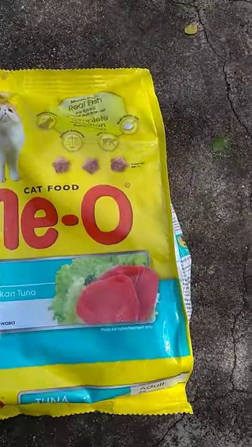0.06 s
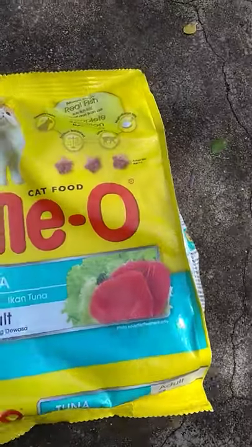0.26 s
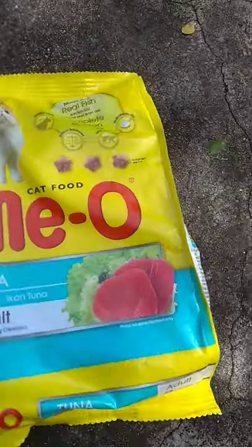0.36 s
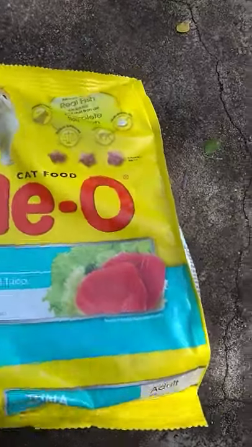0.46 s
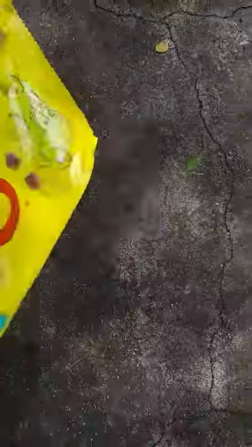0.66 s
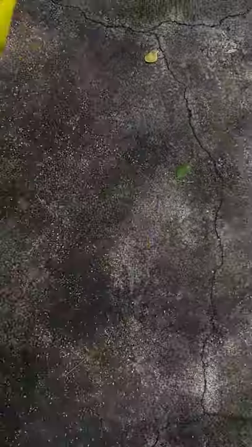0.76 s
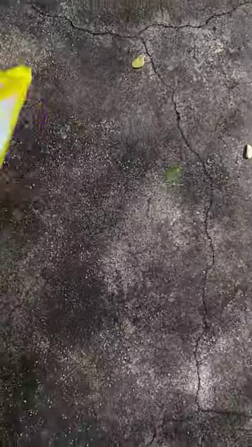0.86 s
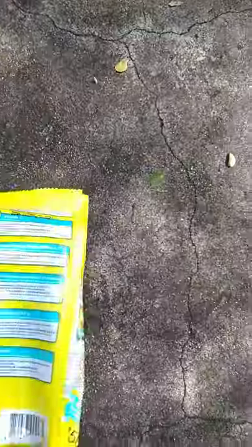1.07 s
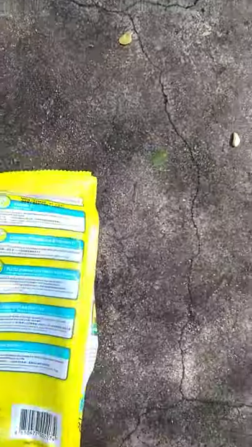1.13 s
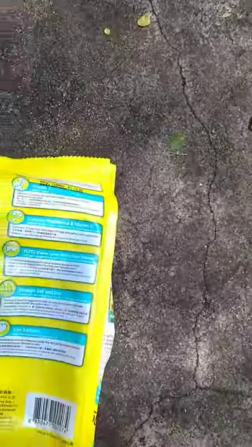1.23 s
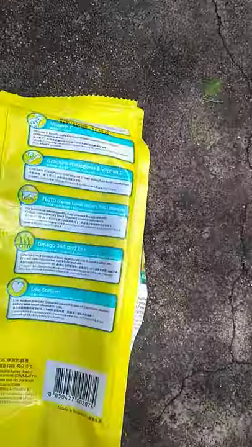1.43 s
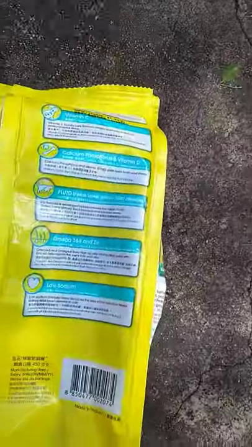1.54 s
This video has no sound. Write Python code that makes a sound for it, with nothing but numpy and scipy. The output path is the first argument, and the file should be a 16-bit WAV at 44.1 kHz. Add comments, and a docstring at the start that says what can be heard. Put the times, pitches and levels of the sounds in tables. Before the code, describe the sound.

Close up in a quiet yard, a filled plastic bag crackles: first separate snaps and pops, then a thick crinkle with dry pellets sliding and dull bumps as it is flipped. It settles, leaving a barely audible insect buzz.

```python
"""A stiff plastic pet-food bag is handled close up, outdoors, over a faint insect buzz and a low rumble.
A small bird chirps once; then the bag is gripped, single creases snap and panels of film pop through.
As it is turned over, swarms of tiny creases crackle, dry pellets slide and the filled bag thuds softly.
It is laid down on concrete and the crackle dies away, leaving the insects and a faint high whir."""
import sys
import numpy as np
from scipy import signal
from scipy.fft import rfft, irfft
from scipy.io import wavfile

SR = 44100
rng = np.random.default_rng(int(sys.argv[2]) if len(sys.argv) > 2 else 0)


def bounce(signal):
    """Save signal as a 16-bit WAV file at the path given by the first command-line argument."""
    frames = np.transpose(np.atleast_2d(signal))
    limited = np.clip(frames, -1, 1)
    pcm = np.round(limited * 32767).astype(np.int16)
    wavfile.write(sys.argv[1], SR, pcm)


N = 70560


def undb(db):
    """Decibels to gain."""
    return 10 ** (np.asarray(db) / 20)


def unit(x):
    """Scale to rms 1."""
    return x / np.sqrt(np.mean(x ** 2))


def curve(table, column=1):
    """Automation lane: one column of a table, joined by straight lines in time."""
    rows = np.array(table, float)
    return np.interp(np.arange(N) / SR, rows[:, 0], rows[:, column])


def butter(x, hz, kind, order=3):
    """Butterworth filter."""
    return signal.sosfilt(signal.butter(order, hz, kind, fs=SR, output="sos"), x)


def eq(x, points, size=2048):
    """Minimum-phase EQ through (freq_hz, gain_db) points."""
    hz, db = np.array(points, float).T
    bins_hz = np.maximum(np.fft.rfftfreq(size, 1 / SR), 1)
    gain = undb(np.interp(np.log(bins_hz), np.log(hz), db))
    cepstrum = irfft(np.log(gain))
    cepstrum[1:size // 2] *= 2
    cepstrum[size // 2 + 1:] = 0
    impulse = irfft(np.exp(rfft(cepstrum)))
    return signal.fftconvolve(x, impulse[None], axes=1)[:, :x.shape[1]]


def stereo_noise(size, correlation):
    """White noise, partly shared by left and right."""
    shared = rng.standard_normal(size)
    return np.sqrt(correlation) * shared + np.sqrt(1 - correlation) * rng.standard_normal((2, size))


def pan(db):
    """Constant-power gains for a pan given as left minus right in dB."""
    gains = undb(np.array([db, -db]) / 2).reshape(2, -1)
    return gains / np.sqrt(np.mean(gains ** 2, axis=0))


def add(out, start_s, sound):
    """Mix a sound in at a time."""
    i = max(int(start_s * SR), 0)
    out[:, i:i + sound.shape[1]] += sound[:, :max(N - i, 0)]


def reverb(x, t60_s, predelay_s):
    """Diffuse reflections of unit energy."""
    t = np.arange(SR // 2) / SR
    tail = rng.standard_normal((2, len(t))) * np.exp(-np.log(1000) * t / t60_s) * (t > predelay_s)
    return signal.fftconvolve(x, unit(tail) / np.sqrt(len(t)), axes=1)[:, :N]


# Fader ride of the insects: time_s, level_db
INSECT_FADER = [(0, -65.5), (.04, -86), (.08, -73.5), (.2, -71), (1.3, -78.5), (1.45, -93), (1.56, -99),
                (1.575, -62), (1.6, -76.5)]
# Fader ride of the distant whir: time_s, level_db
WHIR_FADER = [(1.2, -120), (1.3, -92.5), (1.41, -74), (1.46, -87), (1.54, -95.5), (1.6, -77)]
# Tone of the distant rumble: freq_hz, gain_db
RUMBLE_EQ = [(25, 3.5), (100, -8.5), (220, -6), (450, -23), (700, -37.5), (1200, -38), (2500, -50.5),
             (8000, -30), (15000, -41.5)]


def ambience():
    """The outdoor bed: a narrow insect buzz and a faint high whir over a distant rumble."""
    buzz = unit(butter(stereo_noise(N, 0.31), [7950, 9040], "bandpass", order=4))
    buzz *= undb(curve(INSECT_FADER))
    whir = unit(butter(stereo_noise(N, 0.2), [5400, 6500], "bandpass")) * undb(curve(WHIR_FADER))
    rumble = unit(eq(stereo_noise(N, 0.15), RUMBLE_EQ)) * undb(-73)
    return buzz * pan(23) + whir * pan(5.3) + rumble * pan(6)


# Contour of the bird's call: time_s, pitch_hz, level_db
CHIRP_CONTOUR = [(0, 5230, -120), (.045, 5360, -92), (.064, 5720, -72), (.076, 5800, -66.5),
                 (.084, 6760, -65.5), (.095, 6140, -101), (.118, 6500, -76), (.135, 6300, -74),
                 (.17, 6300, -140)]


def bird(waver=0.014):
    """One thin rising chirp from afar, with its echo; a fast pitch waver makes it slightly hoarse."""
    jitter = unit(butter(rng.standard_normal(N), 600, "lowpass"))
    pitch_hz = curve(CHIRP_CONTOUR) * (1 + waver * jitter)
    tone = np.sqrt(2) * np.sin(2 * np.pi * np.cumsum(pitch_hz) / SR)
    call = (tone * undb(curve(CHIRP_CONTOUR, column=2)))[None]
    return (call + reverb(call, t60_s=0.11, predelay_s=0.0072)) * pan(3.3)


# Fader ride of the moving air: time_s, level_db
AIR_FADER = [(0, -63), (.15, -76), (.5, -70.5), (.72, -70), (.86, -52.5), (1.0, -57.5), (1.15, -62.5),
             (1.3, -69.5), (1.6, -70.5)]


def air():
    """The swinging bag pushes a low flutter of air at the microphone."""
    flutter = butter(stereo_noise(N, 0.43), 99, "lowpass")
    return unit(butter(flutter, 22, "highpass", order=2)) * undb(curve(AIR_FADER))


# Bumps against the hand or the ground: start_s, pitch_hz, level_db, t60_s
THUD_CUES = [(0.33, 227, -45, 0.052), (0.412, 277, -43, 0.036), (0.533, 245.5, -32, .055),
             (.618, 124, -39, 0.025), (0.656, 115, -43, 0.047), (0.76, 75, -52.5, 0.15),
             (.834, 88.7, -38.5, 0.087), (0.838, 215, -39, 0.05), (0.886, 200, -38, .05),
             (1.021, 231.5, -34.5, 0.073), (1.069, 296.6, -32, 0.036), (1.126, 55, -51.5, 0.15),
             (1.193, 226, -42.5, 0.11), (1.28, 243, -48, 0.064), (1.357, 285, -41, 0.024),
             (1.48, 45, -58, 0.2)]


def thuds(size=8000, attack_s=0.00065, blur_mix=0.45):
    """Each bump sounds the bag's low, quickly damped note, blurred by its loose contents."""
    out, t = np.zeros((2, N)), np.arange(size) / SR
    for start_s, pitch_hz, level_db, t60_s in THUD_CUES:
        note = np.sin(2 * np.pi * pitch_hz * t)
        blur = unit(butter(stereo_noise(size, 0.54), [pitch_hz / 2, pitch_hz * 2], "bandpass", order=2))
        envelope = (1 - np.exp(-t / attack_s)) * np.exp(-np.log(1000) * t / t60_s)
        add(out, start_s, undb(level_db) * envelope * (note + blur_mix * blur))
    return out * pan(9.1)


# Fader ride of the pellets sliding along the tilted bag: time_s, level_db
SLIDE_FADER = [(.6, -120), (.68, -77), (.745, -45.5), (.78, -43), (.86, -42), (.91, -47.5), (.96, -49),
               (1.02, -57.5), (1.1, -120)]
# Hollow resonances of the bag: freq_hz, q, gain_db
CAVITY_MODES = [(417, 7.1, 0.5), (500, 3.75, 3.5), (1046, 5.1, -3)]


def pellets(taps_per_s=1400):
    """Dry pellets tap the wall from inside and ring the hollow of the bag."""
    taps = (rng.random(N) < taps_per_s / SR) * stereo_noise(N, 0.67)
    taps = butter(taps, 300, "highpass")
    ring = sum(undb(db) * signal.lfilter(*signal.iirpeak(hz, q, fs=SR), taps)
               for hz, q, db in CAVITY_MODES)
    return unit(butter(ring, 1500, "lowpass")) * undb(curve(SLIDE_FADER)) * pan(5.8)


# Hollow pops of the film: start_s, pitch_hz, level_db
POP_CUES = [(0.2089, 1175, -35.5), (0.2379, 1050, -45), (0.4704, 1230, -28), (.4712, 2264, -36.5),
            (0.561, 1774, -33.5), (0.7729, 1060, -33), (1.2839, 1234, -27), (1.425, 1242, -55)]
# Partials of a flipping panel: pitch_ratio, gain_db, decay_s
POP_PARTIALS = [(.5, -20.5, 0.0023), (1, 2, 0.0025), (2.3, -13.5, 0.0057), (3.27, -18, 0.00098)]


def pops(size=1500):
    """Whole panels of film snap through and ring briefly in a few modes."""
    out, t = np.zeros((2, N)), np.arange(size) / SR
    for start_s, pitch_hz, level_db in POP_CUES:
        ring = sum(undb(gain_db) * np.sin(2 * np.pi * pitch_hz * ratio * t) * np.exp(-t / decay_s)
                   for ratio, gain_db, decay_s in POP_PARTIALS)
        add(out, start_s, undb(level_db) * butter(ring, 506, "highpass", order=4) * pan(15.5))
    return out


# Tone of the stiff film: freq_hz, gain_db
FILM_EQ = [(150, -7.5), (300, -3.5), (450, -3), (620, 6), (820, -3.5), (1150, 4.5), (1550, -6.5),
           (2400, -6), (4000, -8), (5400, -12), (7000, -3), (8800, 4.5), (10500, -3.5), (12500, -8.5),
           (15500, -12)]


def crease(decay_scale, low_cut_hz, size=1200, crack_s=0.00016, burst_s=0.005):
    """One crease buckles: a crack and a short ring of film, as body, mid and treble of equal energy."""
    t = np.arange(size) / SR
    bands = [(1390, "lowpass"), ([1390, 5940], "bandpass"), (5940, "highpass")]
    decays_s, correlations = [0.0036, 0.0026, 0.0019], [0.6, 0.19, 0.15]
    lag = int(0.00007 * SR * rng.standard_normal())  # samples between left and right
    own_eq = np.column_stack([np.geomspace(700, 16000, 26), 4.5 * rng.standard_normal(26)])
    crack = 1 + 1.3 * t / crack_s * np.exp(-t / crack_s)
    parts = []
    for (hz, kind), decay_s, correlation in zip(bands, decays_s, correlations):
        ring = stereo_noise(size, correlation) * np.exp(-t / (decay_s * decay_scale)) * crack
        ring = np.array([np.roll(ring[0], max(lag, 0)), np.roll(ring[1], max(-lag, 0))])
        ring = butter(ring, low_cut_hz, "highpass", order=4)
        ring = eq(eq(ring, FILM_EQ), own_eq)
        parts.append([unit(side) for side in butter(ring, hz, kind)])
    return np.array(parts) * np.sqrt(burst_s * SR / size)  # as much energy as burst_s at rms 1


# Three-band fader ride of the fine crackle: time_s, body_db, mid_db, treble_db
CRINKLE_FADERS = [(.015, -80.5, -79.5, -76.5), (.05, -88, -102, -94), (.19, -91.5, -77, -75),
                  (.23, -84, -71, -62.5), (.31, -59, -61, -61), (.39, -68, -56, -64),
                  (.415, -50, -46.5, -63), (.45, -57.5, -65, -59.5), (.51, -59.5, -58, -59),
                  (.575, -53, -50, -69), (.615, -40, -44, -50), (.73, -47, -44.5, -46.5),
                  (.78, -37.5, -42, -42.5), (.812, -44, -42.5, -36.5), (.825, -48, -38, -33.5),
                  (.87, -41, -37, -29), (.882, -44.5, -43, -46), (.93, -44.5, -43.5, -39),
                  (1.005, -55, -54, -52), (1.022, -35, -34, -40), (1.075, -38.5, -41, -38),
                  (1.135, -44.5, -41, -39.5), (1.19, -39.5, -34.5, -35), (1.228, -42, -47, -42.5),
                  (1.258, -49, -55.5, -54.5), (1.288, -43, -41.5, -49.5), (1.3, -60, -61, -57.5),
                  (1.345, -67.5, -65, -64.5), (1.4, -79.5, -74, -77), (1.47, -80, -85.5, -84.5),
                  (1.555, -91.5, -91, -88.5), (1.575, -76, -78.5, -71)]
# Pan ride of the fine crackle: time_s, pan_db
CRINKLE_PAN = [(.3, 5), (.65, 1), (.78, 4), (.85, 1.5), (.94, 4), (1.03, 3.5), (1.3, 5)]


def crinkling(voices=32, clicks_per_s=2000, spread_db=6.2):
    """As the film flexes, many small creases click at random, each with a resonance of its own."""
    bands = np.zeros((3, 2, N))
    for _ in range(voices):
        triggers = rng.random(N) < clicks_per_s / voices / SR
        strength = undb(spread_db * np.minimum(rng.standard_normal(N), 1.8)) * rng.choice([-1, 1], N)
        click = crease(decay_scale=0.99, low_cut_hz=260) * pan(3 * rng.standard_normal())
        resonance_hz = 3660 * 2 ** (1.4 * rng.uniform(-1.003, 1))
        click += undb(5.5) * signal.lfilter(*signal.iirpeak(resonance_hz, Q=23, fs=SR), click)
        bands += signal.oaconvolve((triggers * strength)[None, None], click, axes=2)[..., :N]
    crackle = sum(unit(band) * undb(curve(CRINKLE_FADERS, column=k + 1)) for k, band in enumerate(bands))
    return crackle * pan(curve(CRINKLE_PAN))


# Snaps of single creases: start_s, body_db, mid_db, treble_db, pan_db
SNAP_CUES = [(0.2073, -44, -32, -37, 6.5), (0.232, -74, -74, -60, -6), (0.2355, -45, -74, -70, -9),
             (0.268, -52, -54, -66, 1.5), (0.2988, -42.5, -45, -48.5, 9), (0.3214, -46.5, -72, -72, 2),
             (0.3343, -41.5, -46.5, -66, 13), (0.3668, -52.5, -49, -46, -1), (0.3814, -72, -42.5, -35, 6),
             (0.4011, -64, -50, -37, 27), (0.4129, -43.5, -42, -54.5, 5),
             (0.4715, -40.5, -37.5, -42.5, 3.5), (0.5241, -47.5, -49, -66, 6),
             (.5341, -39.5, -38, -34.5, -0.5), (0.552, -54, -59, -43, 16), (0.5604, -47, -29.5, -29, 8),
             (0.5973, -40.5, -37, -29, 7), (0.6423, -65, -33.5, -30, 26), (.6598, -36, -33.5, -26, -4),
             (0.6843, -39, -39.5, -46.5, 3.5), (0.6973, -34.5, -56, -53, 6),
             (0.71, -40.5, -39.5, -39.5, 14.5), (0.7694, -30.5, -47.5, -50, 33.5),
             (0.8215, -37, -40, -28, 6), (0.8296, -40, -54.5, -27, 3), (.8366, -40.5, -44.5, -36, 13.5),
             (0.8523, -44, -50, -28.5, -1), (0.8689, -45, -41, -33, 33.5), (0.9311, -51.5, -38, -42, 32.5),
             (0.9415, -41, -36.5, -36, 10.5), (0.9434, -42, -42, -36.5, 9.5),
             (1.0142, -41.5, -38.5, -33, 4.5), (1.0209, -33.5, -43, -28.5, 6.5),
             (1.0315, -43.5, -44.5, -42, 16.5), (1.0787, -32, -48.5, -44, 32),
             (1.1135, -37.5, -51.5, -34, 20), (1.163, -38.5, -34.5, -38, 9.5),
             (1.186, -41.5, -42.5, -47.5, 14), (1.2181, -43.5, -32, -27.5, 3.5),
             (1.2403, -44, -36, -27.5, 12.5), (1.2762, -43, -37.5, -38.5, 1), (1.2844, -35, -54.5, -47, 6),
             (1.357, -45.5, -54.5, -49, 3), (1.3625, -47.5, -54.5, -62, 6), (1.3882, -57, -71, -70.5, 12.5)]


def snaps():
    """The big creases give way one at a time."""
    out = np.zeros((2, N))
    for start_s, *bands_db, pan_db in SNAP_CUES:
        bands = crease(decay_scale=1, low_cut_hz=464)
        add(out, start_s, np.tensordot(undb(bands_db), bands, 1) * pan(pan_db))
    return out


def scene():
    """The mix: the bag up front, its weak reflections from the yard, and the surroundings."""
    bag = snaps() + pops() + crinkling() + pellets() + thuds()
    yard = undb(-17) * reverb(bag, t60_s=0.29, predelay_s=0.0068)
    return bag + yard + air() + bird() + ambience()


def record(dry):
    """A steep high cut on the whole mix."""
    return signal.sosfilt(signal.ellip(8, 0.2, 70, 15600, fs=SR, output="sos"), dry)


dry = scene()
out = record(dry)
bounce(out)
```